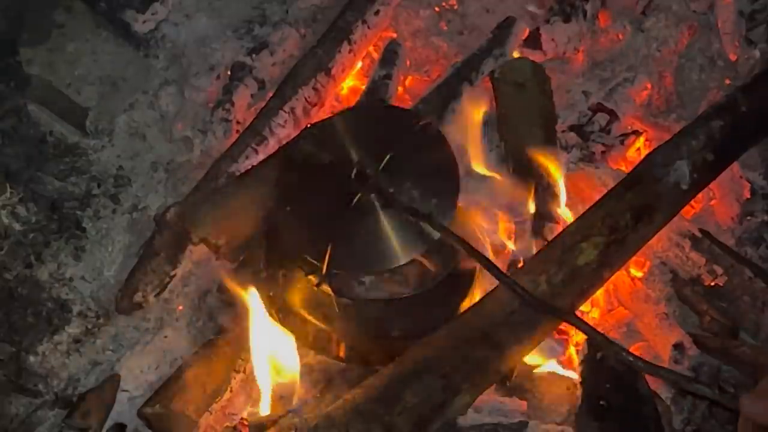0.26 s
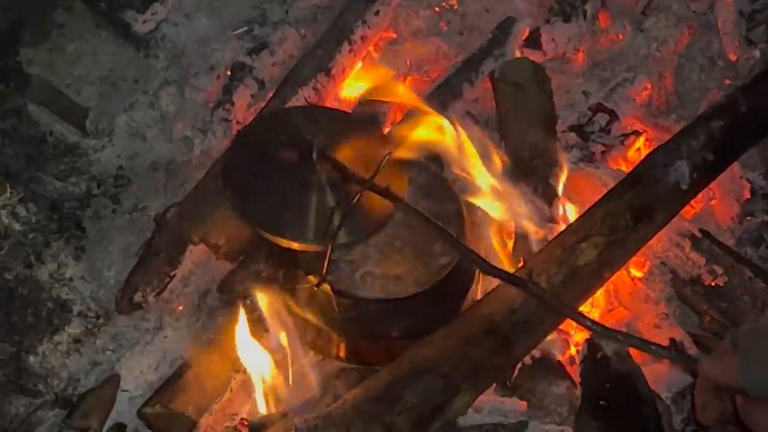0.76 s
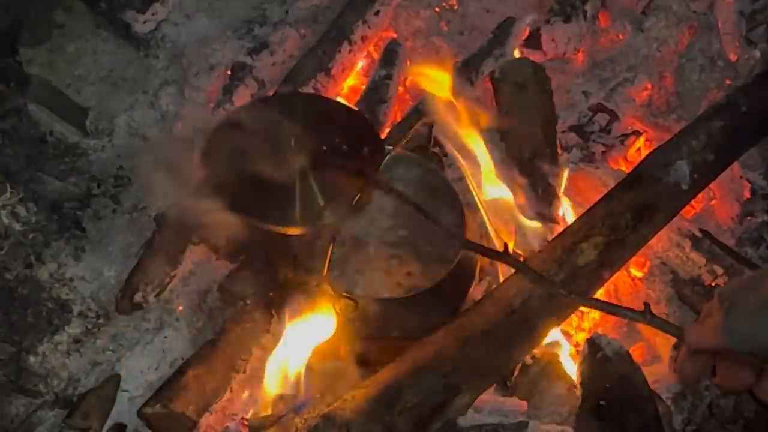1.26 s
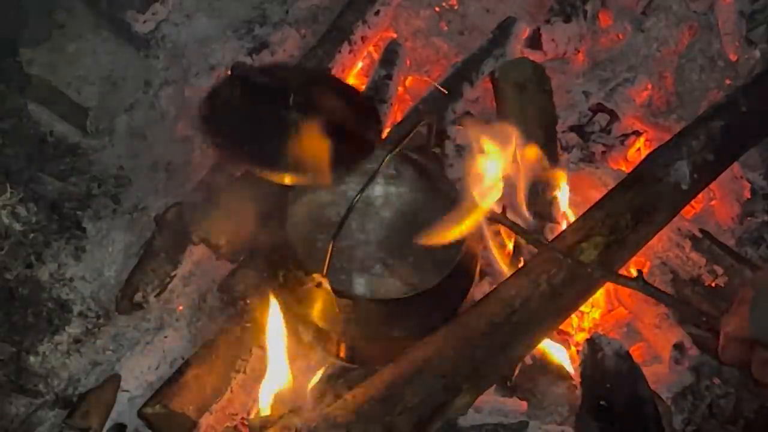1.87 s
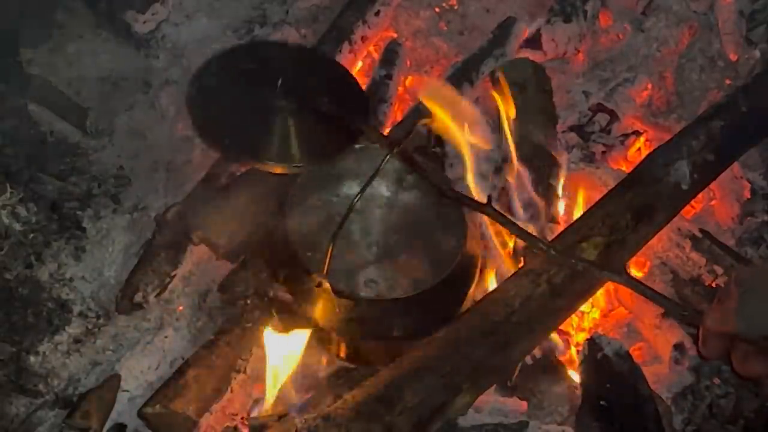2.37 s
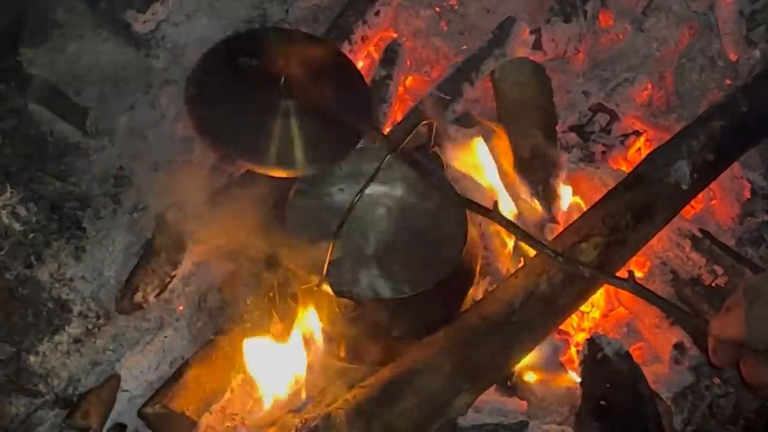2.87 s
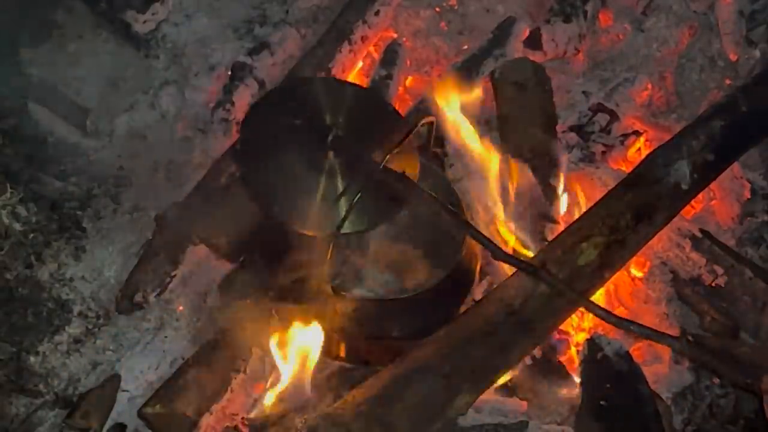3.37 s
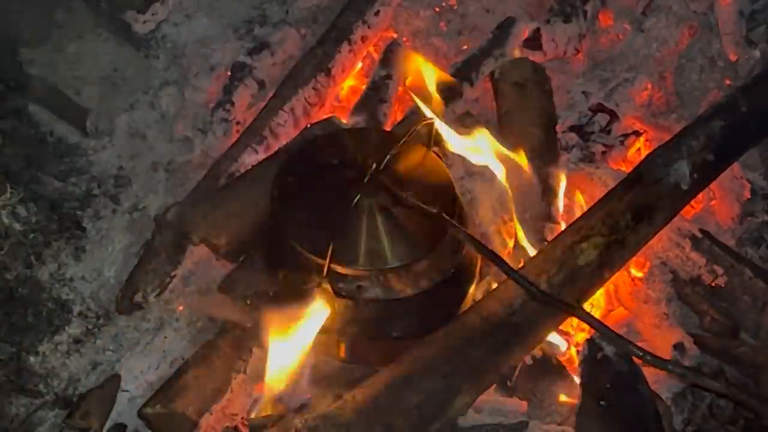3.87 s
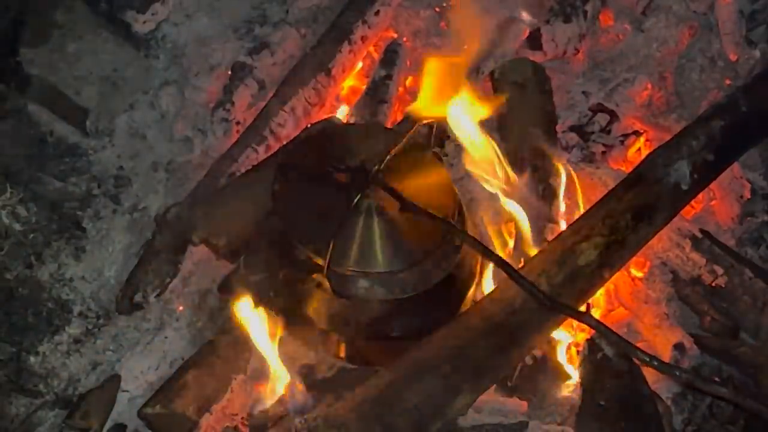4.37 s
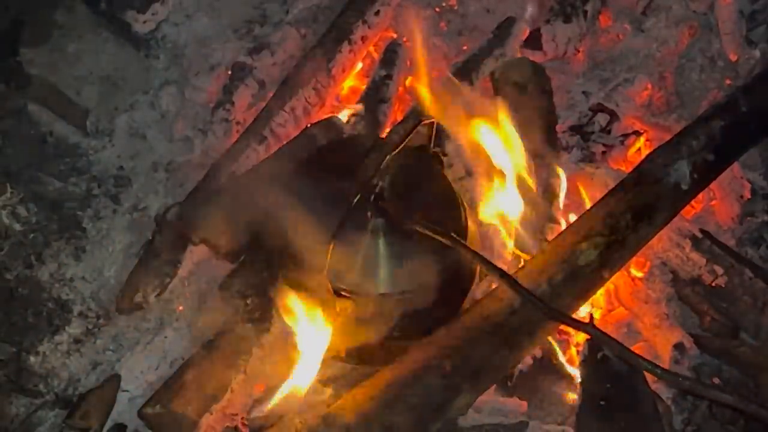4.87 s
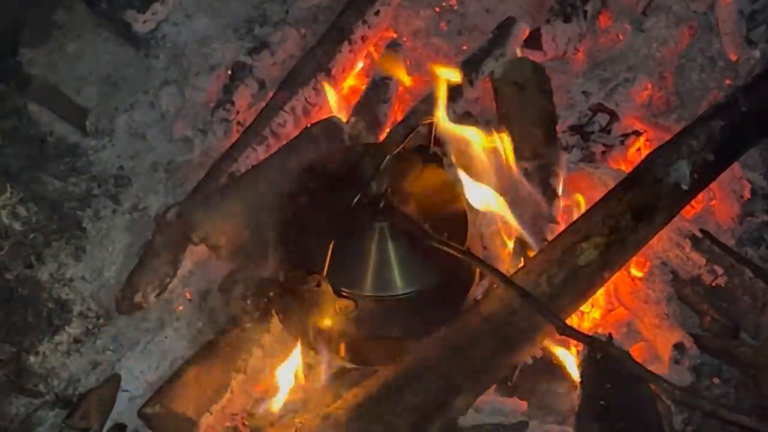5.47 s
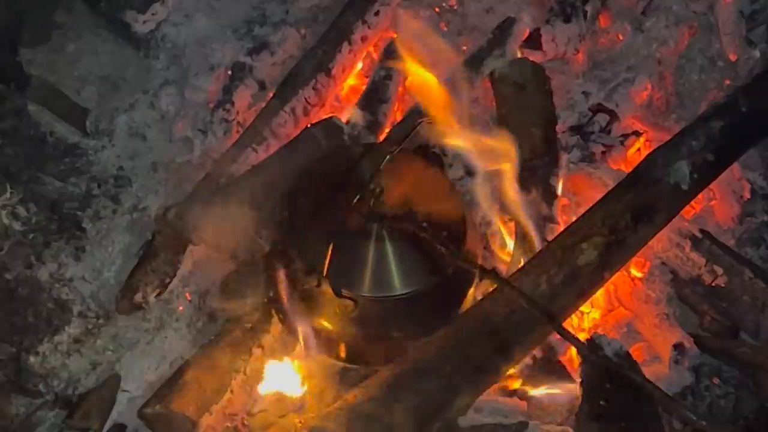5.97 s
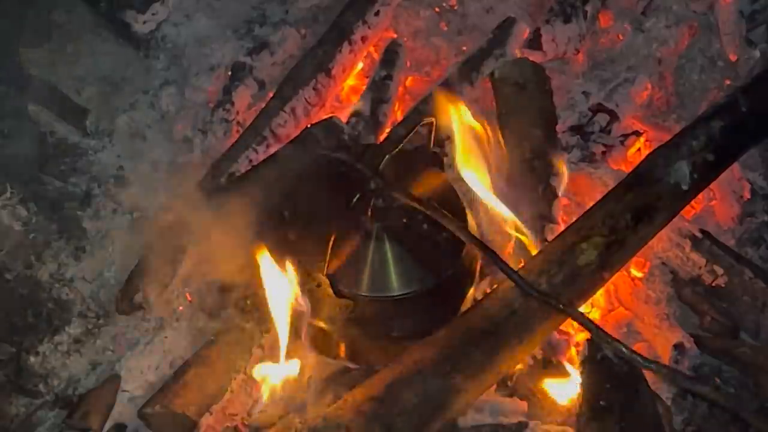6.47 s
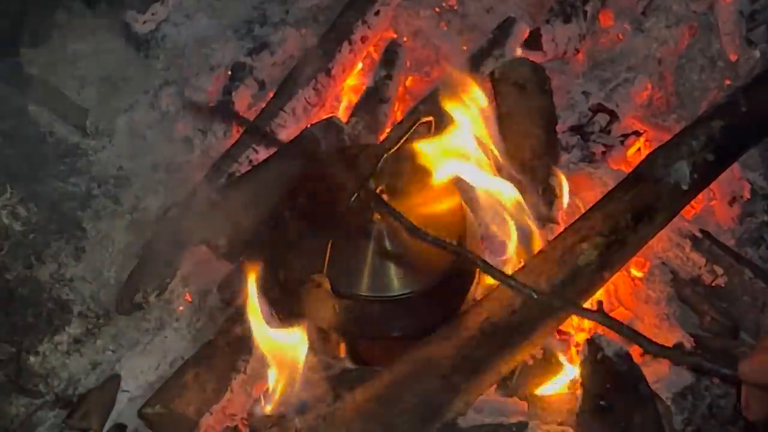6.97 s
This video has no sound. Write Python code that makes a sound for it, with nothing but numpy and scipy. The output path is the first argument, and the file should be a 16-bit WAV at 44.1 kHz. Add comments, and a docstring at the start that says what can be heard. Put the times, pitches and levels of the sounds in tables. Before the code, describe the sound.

Rain taps a stretched tarp with fat drips, embers hiss and wood snaps, as a ringing metal pot lid knocks, then clatters into place.

```python
"""A metal lid is lifted off a pot with a stick, swung about and rattled back onto the rim: ringing modes and clatter.
Around it a campfire burns under a rain shelter at night. Fat drips thump on the taut sheet as falling chirps;
rain patters on it as many small pulses, over a wash of noise. Embers hiss with noise and tiny ticks,
the wood snaps in short noise bursts, and the flames murmur with low noise and a hum."""
import sys
import numpy as np
from scipy import signal
from scipy.fft import rfft, irfft
from scipy.io import wavfile
from scipy.ndimage import uniform_filter1d

SR = 44100
rng = np.random.default_rng(int(sys.argv[2]) if len(sys.argv) > 2 else 0)


def master_out(mix):
    """Clip the mix to full scale and print it as 16-bit PCM to the path in sys.argv[1]."""
    frames = np.transpose(np.atleast_2d(mix))
    ceiling = np.clip(frames, -1, 1)
    pcm = np.round(ceiling * 32767).astype(np.int16)
    wavfile.write(sys.argv[1], SR, pcm)


N = 318402
TIME = np.arange(N) / SR   # seconds
SIZE = 4096   # length of a short pulse, samples


def from_db(db):
    """Decibels to gain."""
    return 10 ** (np.asarray(db) / 20)


def rms_one(x):
    """Scale to unit rms (average strength)."""
    return x / np.sqrt(np.mean(x ** 2) + 1e-20)


def in_time(curve):
    """A curve's value at every sample."""
    return np.interp(TIME, *np.transpose(curve))


def gains(spectrum, size):
    """Turn a table of (pitch_hz, level_db) into a gain for each frequency of a transform."""
    hz, db = np.transpose(spectrum)
    bins_hz = np.fft.rfftfreq(size, 1 / SR)
    return from_db(np.interp(np.log(bins_hz + 1), np.log(hz), db))


def colour(x, spectrum):
    """Filter a signal by a spectrum; rms 1."""
    return rms_one(irfft(rfft(x) * gains(spectrum, N), N))


def noise(spectrum):
    """Random hiss filtered by a spectrum; rms 1."""
    return colour(rng.standard_normal(N), spectrum)


def ringing(spectrum, width_hz, peaky_db):
    """Noise in a dense thicket of resonances, made by random peaks and dips in its spectrum; rms 1."""
    bins = rfft(rng.standard_normal(N))
    width_bins = max(int(width_hz * N / SR), 2)
    peaks = rms_one(uniform_filter1d(rng.standard_normal(len(bins)), width_bins))
    peaky = irfft(bins * from_db(peaky_db * np.clip(peaks, -2, 2)), N)
    return colour(peaky, spectrum)


def add(track, s, sound):
    """Mix a sound in at a time in seconds."""
    start = max(int(s * SR), 0)
    track[..., start:start + sound.shape[-1]] += sound[..., :N - start]


def bursts(times, db, t60, rise_s=0.000053):
    """Envelope that swells at each time and falls 60 dB in t60 seconds; overlapping bursts add in power."""
    kicks = np.zeros(N)
    kicks[(np.asarray(times) * SR).astype(int)] = from_db(db) ** 2
    power_left = from_db(-60 / (t60 * SR)) ** 2   # share of the power that stays after one sample
    power = signal.lfilter([1], [1, -power_left], kicks + 1e-20)
    lag = np.exp(-1 / (rise_s * SR))
    return signal.lfilter([1 - lag], [1, -lag], np.sqrt(power))


def grains(per_s, spread_db):
    """Clicks at random moments, many small and few large, pushing either way."""
    sizes = from_db(spread_db * np.minimum(rng.exponential(1, N), 4))
    happens = rng.random(N) < per_s / SR
    return happens * sizes * rng.choice([-1, 1], N)


def spread(mid, side, width, lead_radians=0.8):
    """Left and right: the side signal, turned ahead in phase, is added on the left and subtracted on the right."""
    # how strongly left and right differ: pitch_hz, level_db
    side_spectrum = [(60, -11), (200, -11.5), (450, -2), (900, 3), (1300, 2.5), (2000, -26.5), (8000, -19)]
    turned = irfft(rfft(side) * gains(side_spectrum, N) * np.exp(1j * lead_radians), N)
    return mid + width * turned * [[1], [-1]]


def sheet_pulse(spectrum, dispersion, ring_hz, ring_db, scatter_db, fade_s=0.0083):
    """A blow carried along the sheet: treble arrives first, bass trails as 1 / sqrt(Hz), folds and edges scatter it."""
    hz, t = np.fft.rfftfreq(SIZE, 1 / SR), np.arange(SIZE) / SR
    # phase in turns; its slope is the delay, which is 5 ms at 1300 Hz
    turns = 2 * dispersion * np.sqrt(hz) + hz * (.005 - dispersion / np.sqrt(1300))
    # the struck patch resonates
    patch = 1 + from_db(ring_db) / (1 + 3.5j * (hz / ring_hz - ring_hz / (hz + 1)))
    echoes = rng.standard_normal(SIZE) * np.exp(-t / fade_s) * (t > .003)
    paths = signal.unit_impulse(SIZE) + from_db(scatter_db) * echoes / np.linalg.norm(echoes)
    return irfft(rfft(paths) * gains(spectrum, SIZE) * patch * np.exp(-2j * np.pi * turns))


def rain(patter_db=0.0, wash_db=-4.5):
    """Small drops land all over the sheet, near and far; behind them is the wash of rain on the ground."""
    # colour of the wash: pitch_hz, level_db
    wash_spectrum = [(30, -9), (70, 0.5), (120, 4.5), (250, 3), (500, -6), (1100, 0), (1700, -0.5),
                     (2600, -18.5), (4000, -48), (8000, -21), (16000, -22)]
    # colour of the small drops: pitch_hz, level_db
    patter_spectrum = [(40, -24), (120, -14.5), (280, 1), (550, -2), (1200, -0.5), (2000, -0.5),
                       (3200, -9.5), (6000, -17), (16000, -6)]
    # rise and fall of the rain: time_s, level_db (before the mix levels)
    rain_level = [(0, -56.5), (.45, -55.5), (.72, -62.5), (.9, -60), (1.2, -51), (1.6, -57), (2.22, -61),
                  (2.47, -53), (2.97, -57), (3.4, -55), (3.95, -58), (4.6, -59), (5.1, -55), (6.4, -57.5),
                  (6.8, -53), (7.22, -54.5)]
    mid, side = np.zeros((2, N))
    for k, ring_hz in enumerate(np.geomspace(280, 2400, num=20)):
        dispersion = rng.uniform(0.049, 0.1678)   # larger = farther along the sheet
        pulse = sheet_pulse(patter_spectrum, dispersion, ring_hz, ring_db=11.5, scatter_db=-8)
        drops = signal.oaconvolve(grains(per_s=13, spread_db=6.0), pulse)[:N]
        mid += drops
        side += drops * (-1) ** k   # patches alternate between the two sides
    patter = spread(rms_one(mid), rms_one(side), width=0.72)
    wash = spread(noise(wash_spectrum), noise(wash_spectrum), width=0.93)
    both = from_db(patter_db) * patter + from_db(wash_db) * wash
    return from_db(in_time(rain_level)) * both * from_db([[.6], [-.6]])   # a little louder on the left


def ground(x):
    """The sound comes back once, fainter, from the ground."""
    echo_s, echo_db = .0083, -15
    return x + from_db(echo_db) * np.interp(TIME - echo_s, TIME, x, left=0)


def flutter(s, thump_db):
    """The sheet shakes briefly after each drip, more after a heavy one: a low noise burst."""
    shake = noise([(35, -30), (75, 0), (160, 0), (400, -12), (1200, -35)])
    return bursts(s + .01, thump_db - 13, t60=.12, rise_s=.004) * shake


def by_weight(thump_db, light_and_heavy):
    """A property of a drip, between that of a light and a heavy one."""
    # thump of a drip that counts as light or heavy: light_db, heavy_db
    weight_db = [-40, -29]
    return np.interp(thump_db, weight_db, light_and_heavy)


def drips(level_db=22):
    """Each drip is a falling chirp from the sheet, a brief splash and a low flutter."""
    # drips on the sheet: start_s, thump_db (relative), extra_brightness_db, ring_hz
    drip_list = [(.117, -58.5, 15.5, 435), (.518, -55, 9, 1120), (.686, -54, 10.5, 600),
                 (.904, -38, 0, 290), (.993, -32.5, 7, 1144), (1.117, -41, -9, 310), (1.205, -39, -16, 920),
                 (1.304, -45.5, 5, 390), (2.215, -54, 13, 483), (2.334, -23, 1.5, 1320),
                 (2.46, -45.5, -2.5, 470), (2.575, -47, 5.5, 473), (2.654, -46, -1, 1410),
                 (2.851, -32.5, 2.5, 875), (3.06, -50.5, 9, 1440), (3.134, -48, -2, 465),
                 (3.329, -58.5, 16, 1600), (3.775, -37.5, 1, 1210), (3.862, -45, 4, 517),
                 (4.081, -33.5, -3.5, 610), (4.138, -46, 2, 378), (4.207, -50, 2.5, 454),
                 (4.371, -31.5, 1, 1500), (4.435, -42, -5.5, 730), (4.621, -28, 1, 252),
                 (5.313, -50.5, 8, 495), (5.421, -46, 3, 513), (5.631, -40, -7.5, 714),
                 (6.004, -39, 5, 371), (6.056, -46, 1, 965), (6.246, -53.5, 10.5, 1320),
                 (6.283, -32.5, 6, 255), (6.371, -27.5, -0.5, 1460), (6.441, -31, 1, 277),
                 (6.896, -48, 1.5, 435)]
    # basic colour of a drip: pitch_hz, level_db
    drip_spectrum = [(30, 3), (70, 16.5), (150, 25), (260, 16), (450, 10), (800, 0.5), (1400, 0),
                     (2000, -10), (3000, -20), (6000, -30)]
    # midrange added to the thump: light_db, heavy_db
    slap_db = [7.5, 10]
    # treble added to the thump: light_db, heavy_db
    treble_db = [2.5, -8]
    # deep bass added to the thump: light_db, heavy_db
    depth_db = [-19, 1.5]
    # light drips scatter more, heavy ones give a cleaner chirp: light_db, heavy_db
    scatter_db = [-6.5, -11.5]
    # ringing of the struck patch: light_db, heavy_db
    patch_ring_db = [8, -4.5]
    # side over mid, as the heavy ones fall to the left: light_ratio, heavy_ratio (before the stereo width)
    leftward = [.35, 1.8]
    mid, side = np.zeros((2, N))
    hz, colour_db = np.transpose(drip_spectrum)
    for s, db, bright_db, ring_hz in drip_list:
        bass_mid_treble_db = [by_weight(db, depth_db), 0, by_weight(db, slap_db) + bright_db]
        tilt_db = np.interp(np.log(hz), np.log([90, 350, 1000]), bass_mid_treble_db)
        pulse = sheet_pulse(np.c_[hz, colour_db + tilt_db], 0.1596, ring_hz,
                            by_weight(db, patch_ring_db), by_weight(db, scatter_db))
        chirp = from_db(level_db + db) * pulse
        add(mid, s - .0035, chirp)   # early, to allow for the delay along the sheet
        add(side, s - .0035, chirp * by_weight(db, leftward))
    s, thump_db, bright_db, _ = np.transpose(drip_list)
    splash_db = thump_db + bright_db + by_weight(thump_db, treble_db)
    splash = bursts(s + 0.00113, splash_db + 1.5, t60=0.0021)
    splash = splash + bursts(s + 0.00066, splash_db - 7.0, t60=0.046)
    splash = splash * noise([(1000, 0.0), (2200, 9.5), (4000, 0.0), (8000, -5.0), (16000, -12.5)])
    return spread(ground(mid + splash) + flutter(s, thump_db), ground(side), width=0.77)


def embers():
    """Embers sizzle: steady hiss and tiny ticks, each a splinter giving way within a millisecond or two."""
    # colour of the sizzle: pitch_hz, level_db
    ember_spectrum = [(800, -13), (2500, 7.5), (4500, 2), (7500, 2.5), (11000, -0.5), (16000, -7)]
    t = TIME[:SIZE]
    ticks = np.zeros(N)
    for fade_s in np.geomspace(.0002, .0015, num=6):
        tick = rng.standard_normal(SIZE) * np.exp(-t / fade_s)
        ticks += signal.oaconvolve(grains(per_s=32, spread_db=5.5), tick)[:N]
    sizzle = from_db(1.5) * noise(ember_spectrum) + from_db(-0.36) * colour(ticks, ember_spectrum)
    return from_db(-61) * sizzle


def snaps():
    """Pockets of steam split the wood: a sharp snap with a short tail, and a lower crack under it."""
    # snaps of the burning wood: start_s, peak_db (relative)
    snap_list = [(0.3496, -41), (0.8629, -31), (0.9043, -23.5), (0.9962, -43.5), (1.2277, -39),
                 (1.2604, -33.5), (1.391, -38), (1.8627, -38), (1.9927, -33), (2.1514, -30.5), (2.303, -39),
                 (2.7703, -42), (2.9469, -34.5), (3.2508, -35), (3.876, -39), (4.1576, -38), (4.2585, -35),
                 (5.192, -35), (5.4956, -36), (5.813, -37.5), (6.3166, -31), (6.5058, -47), (6.7636, -29),
                 (6.805, -34.5)]
    s, snap_db = np.transpose(snap_list)
    snap = bursts(s + 0.0006, snap_db + 3, t60=0.0022) + bursts(s + 0.00053, snap_db - 17.0, t60=0.061)
    crack = bursts(s + 0.0026, snap_db - 9.5, t60=0.0068)
    snap = snap * noise([(2000, -21.5), (5000, 7), (9000, 3.5), (13000, 1), (16000, -2)])
    crack = crack * noise([(400, -16), (1300, 3), (3500, 6.0), (6000, -44)])
    return snap + crack


def flames(murmur_db=1.5, hum_hz=73, hum_db=-2):
    """Flames murmur: low noise, with a low hum that swells along with it."""
    # colour of the murmur: pitch_hz, level_db
    flame_spectrum = [(25, -50), (50, -1), (73, 2.5), (100, -8), (200, -14), (600, -82)]
    # rise and fall of the murmur: time_s, level_db (before the mix levels)
    flame_level = [(0.0, -93), (0.74, -77), (1.12, -72), (1.87, -77), (2.71, -65), (3.44, -63),
                   (3.6, -73.5), (4.62, -68), (4.81, -74.5), (6.27, -72), (6.37, -64), (6.71, -76),
                   (7.22, -68)]
    hum = np.sqrt(2) * np.sin(2 * np.pi * hum_hz * TIME)   # rms 1
    murmur = from_db(murmur_db) * noise(flame_spectrum) + from_db(hum_db) * hum
    return from_db(in_time(flame_level)) * murmur


def fire():
    """The campfire: snapping wood, sizzling embers and murmuring flames added together."""
    return snaps() + embers() + flames()


def by_seating(s, hanging_and_seated):
    """A property of a knock, between that of the hanging and the seated lid."""
    # the lid is put back, and works itself down onto the rim: start_s, end_s
    settling_s = [3.82, 5.02]
    return np.interp(s, settling_s, hanging_and_seated)


def lid_modes(knock_list, contact_s=0.00053, mode_pan_db=2.16, after_ring_db=-30, after_ring_stretch=6.4):
    """Every knock sets the lid's modes (its own pitches) ringing anew; a faint after-ring lingers."""
    # modes of the lid: pitch_hz, level_db, free_ring_t60_s
    mode_list = [(1028, -19, .25), (1556, -18, .5), (2235, -17, .35), (2934, -17, .15), (3224, -11, 1.0),
                 (3489, 1, .7), (3592, -4.5, .6), (3699, -12, .6), (3768, -6, .4), (3795, -2.5, .3),
                 (3930, 2, .07), (4365, -24, .7), (4773, -19, .6), (5486, -24, .3), (5935, -20, .35),
                 (6176, -20, .4), (6364, -19, .45), (6727, -16, .5), (7060, -23, .5), (7302, -20, .55),
                 (7490, -19, .4), (7562, -21, .45), (8177, -22, .4), (10650, -18, .22), (10980, -16, .2),
                 (11837, -14, .3), (12026, -19, .3)]
    # share of the free ringing time that is left: hanging_ratio, seated_ratio
    freedom = [0.42, 0.14]
    ring_db, uneven_db = -7.5, 2.0   # level under a knock, and how it scatters from mode to mode
    out, t = np.zeros((2, N)), TIME[:SR * 3 // 4]
    # thin metal also has a thicket of faint overtones high up
    overtone_hz = np.linspace(5400, 14000, num=44) + rng.normal(0, 160, size=44)
    overtone_db = rng.normal(-22, 3, size=44)
    overtone_t60 = 0.17 * rng.uniform(.6, 1.4, size=44)
    overtones = np.c_[overtone_hz, overtone_db, overtone_t60]
    hz, mode_db, t60 = np.vstack([mode_list, overtones]).T[:, :, None]
    soft_start = 1 - np.exp(-t / contact_s)
    waves = (from_db(mode_db) * np.sin(2 * np.pi * hz * t) * soft_start).astype("f4")
    fall = (-np.log(1000) * t / t60).astype("f4")   # 60 dB is a factor of 1000
    for start, db, _ in knock_list:
        decay = np.maximum(fall / float(by_seating(start, freedom)), -40)
        after_ring = float(from_db(after_ring_db)) * np.exp(decay / float(after_ring_stretch))
        envelope = np.exp(decay) + after_ring
        strength, sign, pan = rng.standard_normal((3, len(hz)))
        weights_db = db + ring_db + uneven_db * strength + mode_pan_db * pan * [[1], [-1]]
        weights = np.sign(sign) * from_db(weights_db)
        add(out, start + 0.001044, weights.astype("f4") @ (waves * envelope))
    return out


def lid_clatter(knock_list):
    """The clatter of a knock: noise bursts in three registers, a dull body, a clang and a bright clash."""
    # dull body: pitch_hz, level_db
    body_spectrum = [(200, -48), (600, -6), (1000, 6), (1600, 6), (2300, 8), (3000, 3.5), (4000, -23)]
    # clang: pitch_hz, level_db
    clang_spectrum = [(2400, -18), (3000, -6), (3500, 10), (3900, 8.5), (4300, -2), (5200, -10)]
    # bright clash: pitch_hz, level_db
    clash_spectrum = [(300, 3), (1500, -1), (3500, 4), (4600, 0), (5400, 2.5), (6100, 8.5), (8000, -1),
                      (11000, 4), (13500, 1), (16000, -51)]
    # body added to the knock: hanging_db, seated_db
    body_share_db = [-5, -1.5]
    # clash added to the knock: hanging_db, seated_db
    clash_share_db = [-16.5, -13]
    s, knock_db, hard_db = np.transpose(knock_list)
    body_db = knock_db + hard_db + by_seating(s, body_share_db)
    clash_db = knock_db + hard_db + by_seating(s, clash_share_db)
    body = bursts(s + 0.00025, body_db - 2, t60=0.024, rise_s=0.00032)
    body = body + bursts(s + 0.0017, body_db - 13.5, t60=.11, rise_s=0.00046)
    body = body * spread(ringing(body_spectrum, width_hz=75, peaky_db=3.0), noise(body_spectrum), width=0.26)
    clang = bursts(s + .001, knock_db - 3, t60=.03, rise_s=.0003) * noise(clang_spectrum)
    clash = bursts(s + 0.0004, clash_db + 2.5, t60=0.13, rise_s=0.00018)
    clash = clash + bursts(s + 0.00048, clash_db - 14, t60=0.4, rise_s=0.0042)
    clash = clash * ringing(clash_spectrum, width_hz=160, peaky_db=6.5)
    return body + clang + clash


def lid():
    """The lid knocks against pot and handle: its modes ring over a clatter of quickly damped ones."""
    # knocks: start_s, ring_db (relative), hardness_db (how much more it clatters and clashes)
    knock_list = [(.232, -49, 0), (.297, -48, 8.5), (.323, -48, 12), (1.025, -28.5, -0.5), (1.170, -35, 0),
                  (1.227, -39, 2), (1.631, -21.5, -2), (1.696, -28, -7), (1.723, -36.5, 0.5),
                  (1.764, -34.5, -2.5), (3.536, -20.5, -1.5), (3.595, -25, -10), (3.627, -30.5, -2),
                  (3.673, -35, -5.5), (3.751, -40, 5.5), (4.662, -27.5, -2.5), (4.673, -34.5, -7),
                  (4.704, -20, -4), (4.733, -27, 1.5), (4.743, -17, -4.5), (4.747, -24, -24),
                  (4.772, -30, -14), (4.796, -31.5, -1.5), (4.89, -39, -4), (4.907, -35.5, 5),
                  (4.927, -34, 1), (4.949, -23.5, -2.5), (4.963, -29.5, -7), (5.591, -28, 0.5),
                  (5.604, -52, -2), (5.923, -43.5, -13), (5.989, -36.5, 1), (6.005, -29.5, -5.5),
                  (7.137, -46.5, 9)]
    return lid_modes(knock_list) + lid_clatter(knock_list)


def scene():
    """Rain, drips, fire and lid together."""
    return rain() + drips() + fire() + lid()


def record(dry):
    """Left and right turn in and out of phase in the high treble; everything above 15.9 kHz is cut."""
    # phase by which the left leads the right: pitch_hz, lead_radians
    port_phase = [(0, 0), (8100, 0), (8500, 1.5), (8900, 2.9), (9800, 3.3), (10600, 4.7), (11400, 6.1),
                  (12400, 6.4), (13200, 8.0), (13900, 9.3), (14900, 9.6), (15700, 11)]
    phase = np.interp(np.fft.rfftfreq(N, 1 / SR), *np.transpose(port_phase))
    right = irfft(rfft(dry[1]) * np.exp(-1j * phase), N)
    top_cut = signal.ellip(10, .2, 70, 15900, fs=SR, output="sos")
    return signal.sosfilt(top_cut, np.array([dry[0], right]))


dry = scene()
out = record(dry)
master_out(out)
```